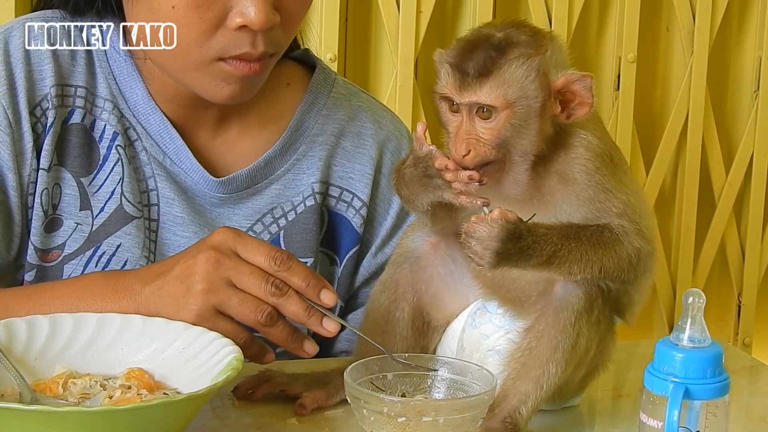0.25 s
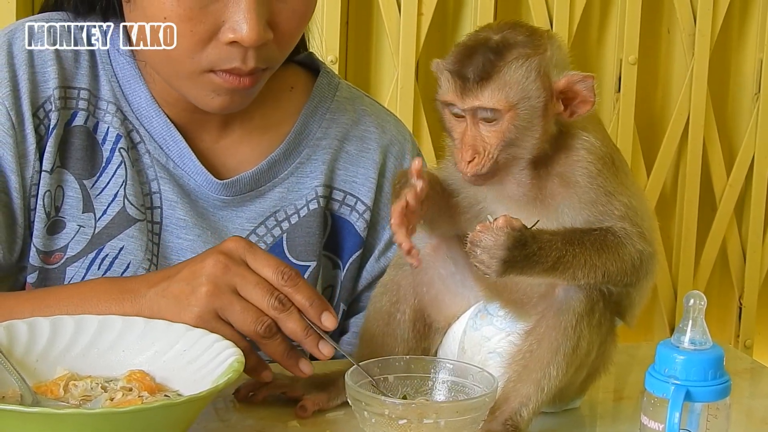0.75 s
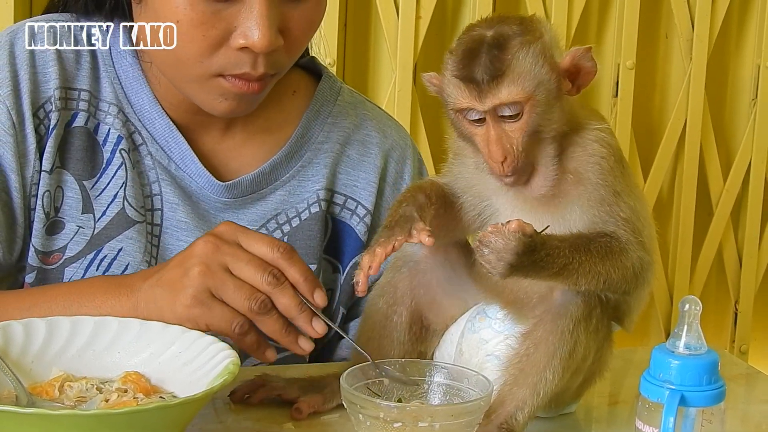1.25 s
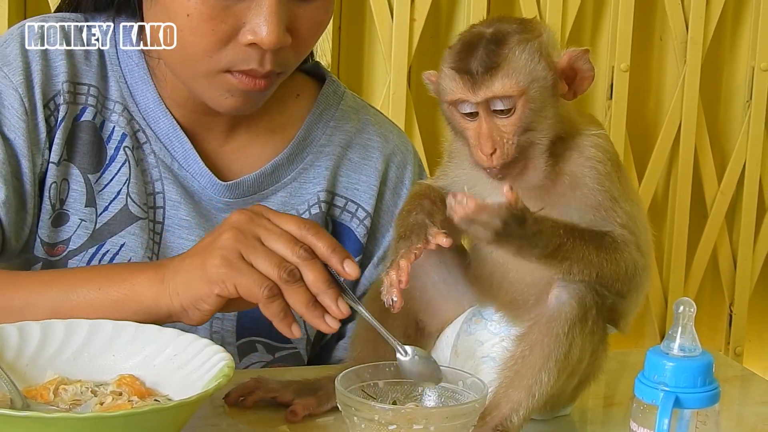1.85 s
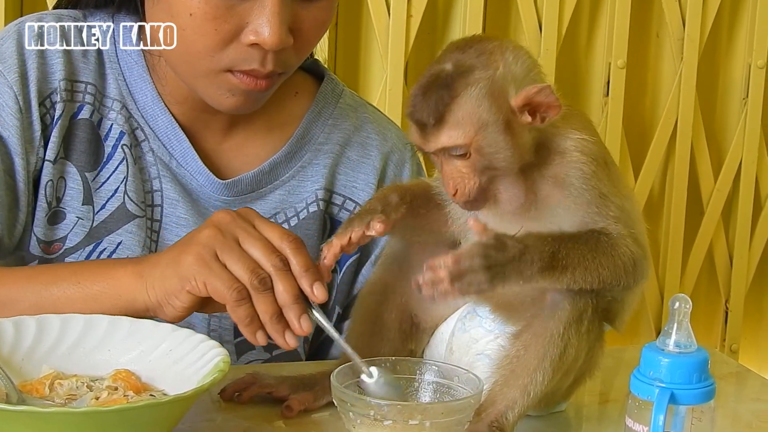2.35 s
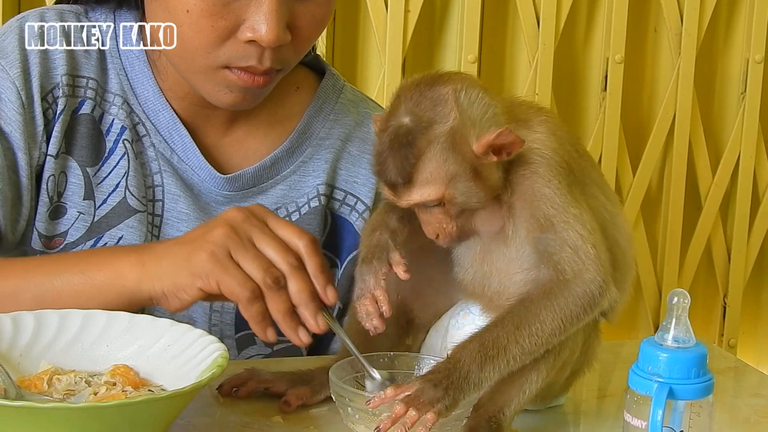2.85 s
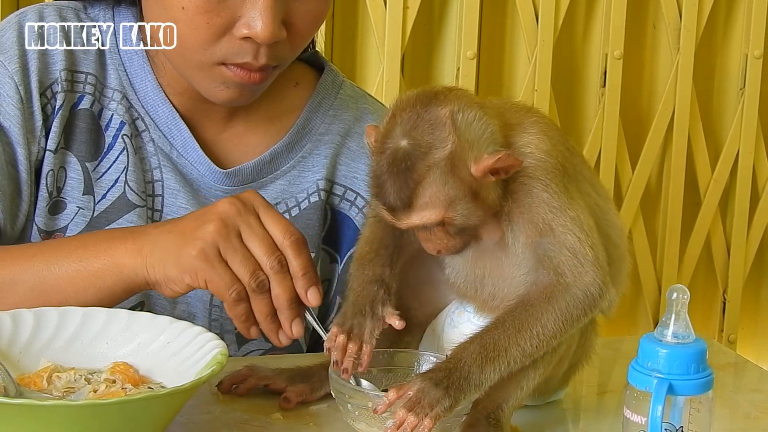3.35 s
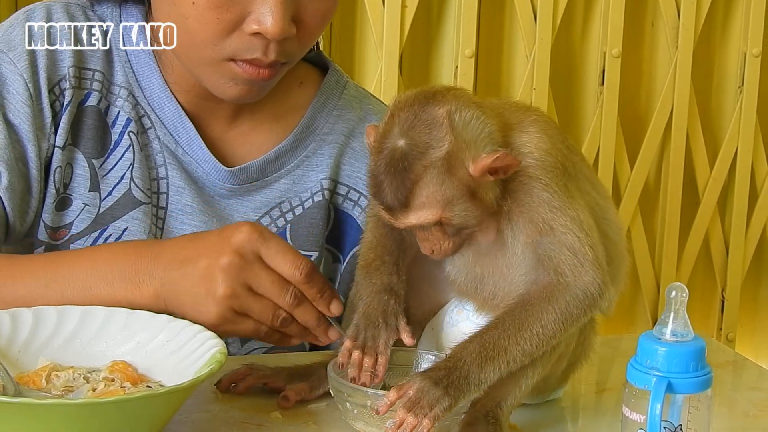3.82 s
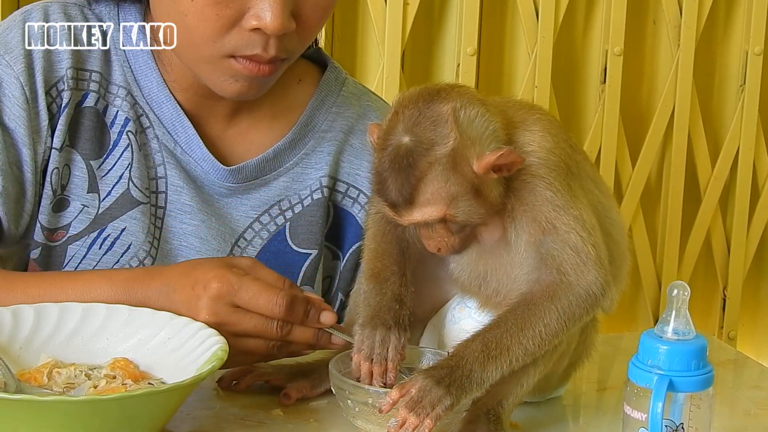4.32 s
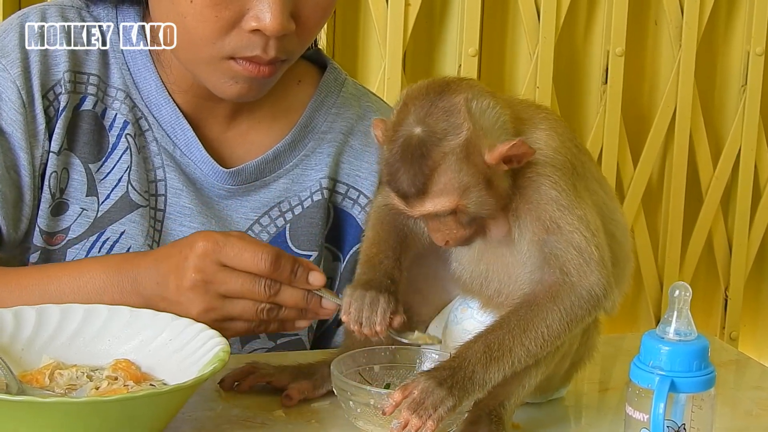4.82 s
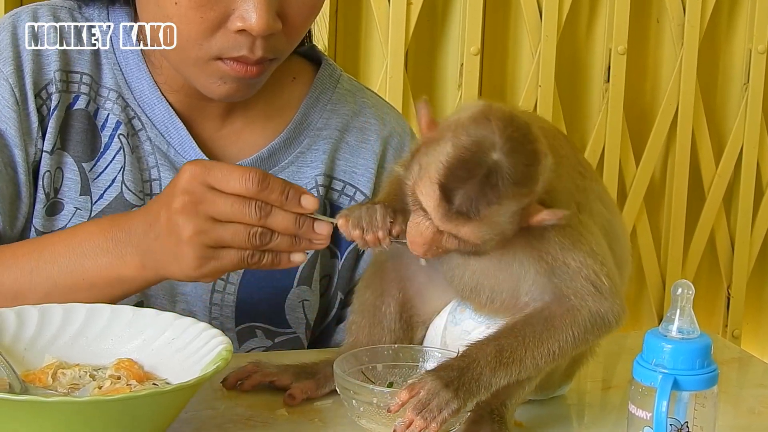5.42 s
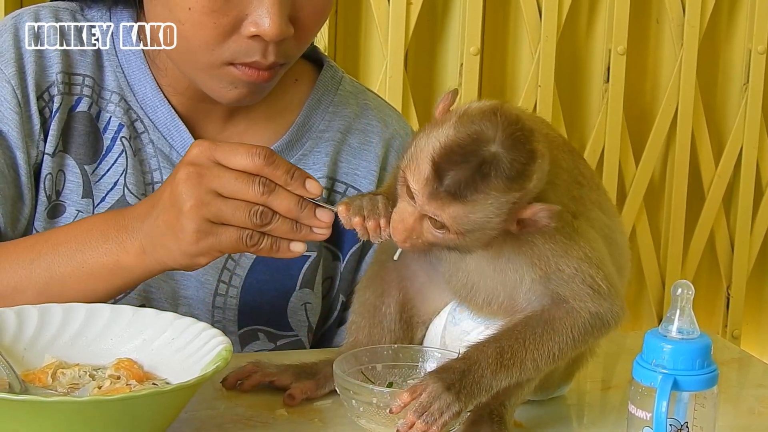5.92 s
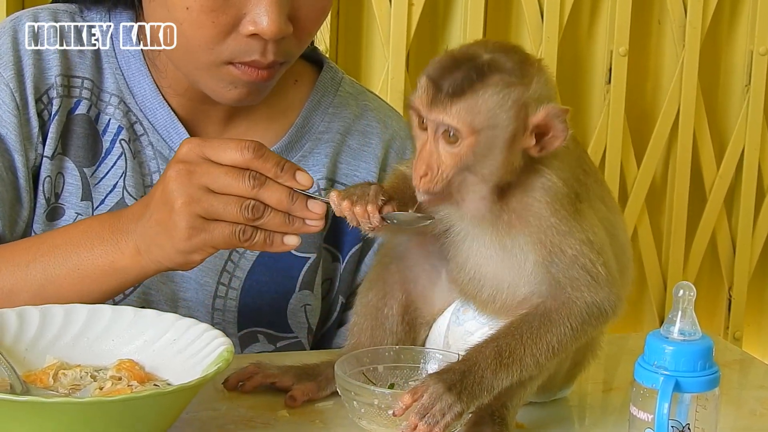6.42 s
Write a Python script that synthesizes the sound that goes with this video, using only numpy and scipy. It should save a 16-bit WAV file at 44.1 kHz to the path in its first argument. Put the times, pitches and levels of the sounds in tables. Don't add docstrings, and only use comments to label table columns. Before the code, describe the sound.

A spoon clinks brightly against a bowl while a sparrow chirps and distant birds answer; late on, one loud monkey coo drops in pitch.

```python
import sys
import numpy as np
from scipy import signal
from scipy.io import wavfile
from scipy.ndimage import uniform_filter1d

SR = 44100
rng = np.random.default_rng(int(sys.argv[2]) if len(sys.argv) > 2 else 0)


def attenuation_scalar(level_db):
    decades = np.asarray(level_db, float) / 20
    return 10 ** decades


def persist_wave(psi):
    counts = np.round(np.clip(psi, -1, 1) * 32767).astype(np.int16)
    wavfile.write(sys.argv[1], SR, np.atleast_2d(counts).T)


N = 294179

# t/s, f/Hz, level/dB (effort)
COO_PATH = [
    (5.59, 756, -24.5),
    (5.64, 792, -21),
    (5.699, 790.5, -19.5),
    (5.75, 776.3, -19.5),
    (5.807, 742.2, -17.5),
    (5.83, 711.7, -18),
    (5.885, 676.4, -19),
    (5.92, 650, -27),
    (5.985, 525.6, -32.5),
]
# f/Hz, level/dB
LOW_THROAT = [(1500, -9), (1800, 0), (2000, -2), (2150, -15), (2900, -16), (3450, -3), (3900, -15),
              (4600, -24), (6000, -60)]
# f/Hz, level/dB
HIGH_THROAT = [(4700, -34), (5050, -21), (5400, -10), (5800, 0), (6200, 1), (7000, -5), (7500, -1),
               (7950, -2), (8300, -13), (8700, -21), (10000, -70)]
# t/s, level/dB, low pitch factor, high pitch factor, length factor
CHIRPS = [
    (0.442, -32, 1.01, 1.016, 0.81),
    (1.451, -34.5, 1.04, 0.99, 0.87),
    (2.451, -32, 1.038, 0.99, 0.98),
    (3.996, -32.5, 1.008, 1.02, 0.87),
    (4.985, -34.5, 1.01, .96, 0.96),
    (6.195, -31.5, 1.005, 0.99, 0.82),
]
# t/s, level/dB, first f/Hz, last f/Hz, length/s
FAR_CALLS = [(0.0, -51, 5200, 4490, 0.031), (0.145, -46, 7090, 5870, 0.082), (0.3, -60, 3700, 3498, 0.091),
             (0.951, -43.5, 6700, 6250, 0.052), (1.415, -38.5, 6100, 6240, 0.062),
             (2.029, -45, 7180, 5900, 0.1), (2.846, -52.5, 4280, 3984, 0.13),
             (3.133, -42, 6050, 5760, 0.083), (3.651, -46, 6500, 6150, .07), (3.972, -52, 6800, 6000, .06),
             (4.498, -42.5, 6900, 6460, 0.057), (4.99, -43, 6900, 6780, 0.059)]
# t/s, level/dB, first f/Hz, last f/Hz, length/s
SCOLDS = [
    (3.169, -47.5, 5590, 5000, 0.15),
    (4.349, -54.5, 4740, 4400, .2),
    (6.08, -48, 7300, 6470, 0.13),
    (6.372, -38.5, 5280, 5750, 0.12),
    (6.42, -47.5, 4410, 4220, 0.094),
    (6.451, -41.5, 6340, 7060, 0.15),
    (6.561, -42, 6360, 6980, .11),
    (6.58, -41.5, 5040, 4610, 0.1),
]
# t/s, level/dB, first f/Hz, last f/Hz, length/s
PEEPS = [
    (3.212, -53.5, 5900, 5680, 0.18),
    (3.702, -46, 7000, 6800, 0.054),
    (6.559, -37.5, 4770, 4830, 0.013),
]
# t/s, peak level/dB, bowl knock level/dB, lower ring level/dB, left-right level/dB
TAPS = [
    (0.759, -21.5, -13, -10.5, 4.5),
    (0.781, -30, -18, -32, -8),
    (1.019, -50, -17, 5, -3.5),
    (1.6602, -28, -12.5, -3.5, 1),
    (2.0572, -37, -16, -31, 2),
    (3.4489, -19.5, -19.5, -9, 1),
]
# f/Hz, level/dB, t60/s
SPOON_MAIN = [(6728, -12, .5), (6757, -12, .45), (6804, -13, .35), (6700, 1, .045)]
# f/Hz, level/dB, t60/s
SPOON_UPPER = [(5900, -8, .03), (7700, -14, 0.024), (9330, -27, .02), (10200, -23, .04), (10700, -21, .02)]
# f/Hz, level/dB, t60/s
SPOON_HANDLE = [(3795, -15, .4), (3815, -19, .3), (3850, 0, .03), (4500, 0, .03)]
# f/Hz, level/dB, t60/s
BOWL_KNOCK = [(1068, -6.5, 0.12), (1355, 5.5, 0.024), (1550, 6, 0.025), (2660, -7, 0.028)]
# t/s, level/dB
RUSTLE = [
    (6.2, -76),
    (6.32, -46.5),
    (6.45, -49),
    (6.55, -46.5),
    (6.67, -48.5),
]
# t/s, length/s, level/dB (rms), f/Hz
PUMP_RUNS = [
    (.3, .95, -60, 333),
    (1.0, 1.36, -56, 206.7),
    (1.999, 1.28, -54, 332.3),
    (3.35, 0.72, -58, 336.4),
    (4.9, 1.15, -55.5, 333.5),
    (5.25, 0.52, -53.5, 219.6),
    (5.9, 0.57, -50.5, 160),
]
# f/Hz, width f/Hz, level/dB (rms)
HUM = [(76.3, 11, -63), (162, 15, -56), (211.5, 24, -59), (257.7, 19, -63.5)]
# t/s, level/dB
HUM_SWELL = [
    (0.0, -54),
    (0.03, -47.5),
    (0.13, -52.5),
    (2.6, -48.5),
    (4.12, -52),
    (5.35, -48.5),
    (6.39, -48),
    (6.46, -53.5),
    (6.67, -52.5),
]
# f/Hz, level/dB (per Hz)
WASH = [(18, -41.5), (30, -35), (64, -6.5), (108, -6), (141, -12.5), (225, -4), (278, -5.5), (642, -12.5),
        (1110, -7), (1980, -11), (3600, -19), (4300, -14.5), (5360, -14), (7150, -15.5), (9290, -35.5),
        (15700, -43.5)]
# f/Hz, likeness
WASH_LIKENESS = [(60, 0.91), (150, 0.91), (380, 0.92), (950, 0.9), (2380, 0.74), (5980, 0.4), (15000, 0.02)]
# f/Hz, t60/s
ROOM = [(200, 1), (700, 0.56), (2000, 1), (5000, 0.88), (7000, 0.76), (12000, 0.077)]

FULL_DB, OPEN_S, SHUT_DB, PRESS_DB_PER_S = -17.5, 0.036, -26.5, 33.5
OCTAVE_DB, OCTAVE_SHARE, LOW_DB, LOW_SHARE, HIGH_DB, HIGH_SHARE = -44, 0.19, -50, 0.24, -30, 0.75
REST_HZ, THROAT_FOLLOWS, OCTAVE_DB_PER_OCTAVE, FRONT_HZ = 770, 0.3, 23, 7400
CHIRP_S, SCOOP_S, HOLD_S, RELEASE_S = 0.2, 0.01293, 0.033, 0.017
START_HZ, TOP_HZ, FLOOR_HZ, CLIMB_HZ_PER_S = 4252, 4840, 4140, 2900
WARBLE_PER_S, SLOWING, DIP_DB, SAG_DB_PER_S = 48, 75, -3, -8
HELD_DB, FLICK_DB, FLICK_S, UNEVEN = -3, 4, 0.006, 0.15
ACCENT_S, ACCENT_WIDTH_S, ACCENT_DB, ACCENT_NARROWS = 0.108, 0.008, 5.5, 0.7
JOIN_S, UPPER_DB, UPPER_HZ, ARCH_HZ, SINK_HZ, ARCH_POWER = 0.05, -3, 5784, 502, -400, 0.8
FAR_TRILL, SCOLD_TRILL, PEEP_TRILL = 0.042, 0.112, 0.01
WASH_DB = -43


def monkey():
    s, *columns = np.transpose(COO_PATH)
    t = np.arange(s[0], s[-1], 1 / SR)
    hz, effort_db = (np.interp(t, s, column) for column in columns)
    drop_db = effort_db - FULL_DB
    shut_db = SHUT_DB * np.exp(-(t - s[0]) / OPEN_S)
    octave_db = OCTAVE_DB + OCTAVE_SHARE * drop_db + shut_db + OCTAVE_DB_PER_OCTAVE * np.log2(hz / REST_HZ)
    low_db = LOW_DB + LOW_SHARE * drop_db + PRESS_DB_PER_S * (t - s[0])
    high_db = HIGH_DB + HIGH_SHARE * drop_db + shut_db

    hz = uniform_filter1d(hz, 600) * (1 + 0.0012 * wobble(len(t), span=150))
    turn = 2 * np.pi * np.cumsum(hz) / SR
    voice = attenuation_scalar(effort_db) * np.sin(turn)
    voice += attenuation_scalar(octave_db + 4.9 * wobble(len(t), span=500)) * np.sin(2 * turn)
    for k in range(3, 17):
        follows = THROAT_FOLLOWS * np.clip((FRONT_HZ - k * hz) / 900, 0, 1)
        throat_hz = k * hz * (REST_HZ / hz) ** follows
        colour = attenuation_scalar(low_db + read(LOW_THROAT, k * hz)) + attenuation_scalar(high_db - 7.0 + read(HIGH_THROAT, throat_hz))
        fade = attenuation_scalar(2.5 * wobble(len(t), span=600))
        voice += colour * fade * np.sin(k * turn + k * k)
    breath = band(band(rng.standard_normal(len(t)), 4170, 8300), 4800, 8600)
    voice += attenuation_scalar(high_db - 17) * evened(breath)
    out = np.zeros((2, N))
    add(out, s[0], np.sqrt(2) * voice * signal.windows.tukey(len(t), 0.1), pan_db=0.1)
    return out


def sparrow():
    out = np.zeros((2, N))
    for s, db, low, high, longer in CHIRPS:
        t = np.arange(0, CHIRP_S * longer, 1 / SR) / longer
        low_hz, low_db = low_side(t)
        high_hz, high_db = high_side(t)
        add(out, s, side(low * low_hz, db + low_db, trill=0.0079, octave_db=-32.5), pan_db=1.2)
        add(out, s, side(high * high_hz, db + high_db, trill=0.1376, octave_db=-57), pan_db=1.2)
    return out


def low_side(t):
    since = np.maximum(t - HOLD_S, 0)
    warble = (WARBLE_PER_S - SLOWING * since) * since
    dip = 0.5 - 0.5 * signal.sawtooth(2 * np.pi * (warble + 0.5), 0.5)
    accent = np.exp(-((t - ACCENT_S) / ACCENT_WIDTH_S) ** 2)
    scoop = np.minimum(t / SCOOP_S, 1)
    reach_hz = (TOP_HZ - FLOOR_HZ + CLIMB_HZ_PER_S * since) * (1 - ACCENT_NARROWS * accent)
    uneven_dip = dip * (1 + UNEVEN * wobble(len(t), span=500))
    hz = FLOOR_HZ + reach_hz * (1 - uneven_dip) + (START_HZ - TOP_HZ) * (1 - scoop)
    ends_db = -10 * (1 - scoop) - 16 * np.clip(1 - (CHIRP_S - t) / RELEASE_S, 0, 1)
    hold_db = HELD_DB * (t < HOLD_S) + FLICK_DB * np.exp(-((t - HOLD_S) / FLICK_S) ** 2)
    return hz, -1.5 + ends_db + hold_db + DIP_DB * dip + SAG_DB_PER_S * since + ACCENT_DB * accent


def high_side(t):
    u = np.clip((t - JOIN_S) / (CHIRP_S - JOIN_S), 0, 1)
    arch = np.sin(np.pi * u ** ARCH_POWER)
    return UPPER_HZ + ARCH_HZ * arch + SINK_HZ * u, UPPER_DB + 24 * np.log10(abs(arch) + 1e-4)


def side(hz, db, trill, octave_db):
    t = np.arange(len(hz)) / SR
    cycles = 75 * t + 0.4 * wobble(len(t), span=400) + rng.random()
    swing = signal.sawtooth(2 * np.pi * cycles, 0.5)
    return whistle(uniform_filter1d(hz * (1 + trill * swing), 100), db, rough=0.0138, octave_db=octave_db)


def whistle(hz, db, rough, octave_db):
    hz = hz * (1 + rough * wobble(len(hz), span=60))
    turn = 2 * np.pi * np.cumsum(hz) / SR
    rasp = 1 + 0.24 * wobble(len(hz), span=30)
    flutter_db = 1.5 * wobble(len(hz), span=120)
    tone = np.sin(turn) + attenuation_scalar(octave_db) * np.sin(2 * turn)
    return np.sqrt(2) * attenuation_scalar(db + flutter_db) * rasp * tone


def spoon():
    out, t = np.zeros((2, N)), np.arange(SR // 2) / SR
    soft = 1 - np.exp(-t / 0.0004)
    for s, db, knock_db, low_db, pan_db in TAPS:
        burst = attenuation_scalar(-1.5 - 60 * t / 0.011) * rng.standard_normal(len(t))
        tick = band(band(burst, 3300, 8600), 3200, 9500)
        steel = ring(SPOON_MAIN, t) + ring(SPOON_UPPER, t) + attenuation_scalar(low_db + 2.5) * ring(SPOON_HANDLE, t)
        knock = attenuation_scalar(knock_db + 7.5) * ring(BOWL_KNOCK, t)
        add(out, s, attenuation_scalar(db - 7) * (tick + soft * steel + soft * knock), pan_db)
    return out


def ring(modes, t):
    out = np.zeros(len(t))
    for hz, db, t60 in modes:
        decay = attenuation_scalar(db + rng.normal(0, 0.56) - 60 * t / t60)
        out += decay * np.sin(2 * np.pi * hz * rng.normal(1, 0.0015) * t)
    return out


def rustle():
    s, db = np.transpose(RUSTLE)
    grains = rng.standard_normal((2, N)) * attenuation_scalar(2.9 * wobble(N, span=90))
    level_db = np.interp(np.arange(N) / SR, s, db, left=-120)
    return attenuation_scalar(level_db) * evened(band(band(grains, 2300, 8200), 2000, 7900))


def far_birds():
    out = np.zeros((2, 2, N))
    for near, calls, depth in ((0, FAR_CALLS, FAR_TRILL), (0, SCOLDS, SCOLD_TRILL), (1, PEEPS, PEEP_TRILL)):
        for s, db, first_hz, last_hz, length in calls:
            u = np.linspace(0, 1, round(length * SR))
            trill = 1 + depth * np.sin(2 * np.pi * 45 * length * u)
            hz = (first_hz + (last_hz - first_hz) * u) * trill
            call = whistle(hz, db, rough=0.014 - 0.0064 * near, octave_db=-56)
            add(out[near], s, call * signal.windows.tukey(len(u), 0.4), pan_db=0.6)
    return out


def pump():
    out = np.zeros((2, N))
    for s, length, db, hz in PUMP_RUNS:
        size = round(length * SR)
        turn = 2 * np.pi * np.cumsum(hz * (1 + 0.0044 * wobble(size, span=3000))) / SR
        level = attenuation_scalar(db + 1.5 + 2.2 * wobble(size, span=2500))
        add(out, s, level * np.sin(turn) * signal.windows.tukey(size, 0.2), pan_db=0.1)
    return out


def hum():
    t, out = np.arange(N) / SR, np.zeros(N)
    for hz, width_hz, db in HUM:
        r = np.exp(-np.pi * width_hz / SR)
        slow = rng.standard_normal(N) + 1j * rng.standard_normal(N)
        for _ in range(2):
            slow = signal.lfilter([1 - r], [1, -r], slow)
        out += attenuation_scalar(db) * evened((slow * np.exp(2j * np.pi * hz * t)).real)
    s, db = np.transpose(HUM_SWELL)
    return out * attenuation_scalar(1.53 * np.interp(t, s, db - db.mean()) + 1.2 * wobble(N, span=5000))


def wash():
    frames, hz = N // 256 + 5, np.fft.rfftfreq(1024, 1 / SR)
    a, b, c, d, patches = rng.standard_normal((frames, 513, 5)).T
    patches = evened(uniform_filter1d(uniform_filter1d(patches, size=14, axis=0), size=16, axis=1))
    same = np.clip(read(WASH_LIKENESS, hz), -1, 1)[:, None]
    left = a + 1j * b
    right = same * left + np.sqrt(1 - same ** 2) * (c + 1j * d)
    z = np.array([left, right]) * attenuation_scalar(read(WASH, hz)[:, None] + 1.41 * patches)
    sound = signal.istft(z, nperseg=1024, noverlap=768)[1][:, :N]
    return attenuation_scalar(WASH_DB - 1.1) * evened(sound)


def room(x, likeness, slower):
    taps = np.zeros((2, SR))
    at = np.arange(300, SR - 20, 20) + rng.integers(0, 20, (2, (SR - 301) // 20))
    np.put_along_axis(taps, at, rng.choice([-1., 1.], at.shape), 1)
    like = np.clip(likeness, 0, 1)
    taps[1] = like * taps[0] + np.sqrt(1 - like ** 2) * taps[1]
    hz, t, z = signal.stft(taps, SR, nperseg=256)
    decay = attenuation_scalar(-60 * t / (slower * read(ROOM, hz)[:, None]))
    tail = signal.istft(z * decay, SR, nperseg=256)[1]
    return signal.fftconvolve(x, tail / np.linalg.norm(tail[0]), axes=1)[:, :N]


def evened(x):
    return x / np.sqrt(np.mean(x ** 2) + 1e-20)


def wobble(size, span):
    return evened(uniform_filter1d(uniform_filter1d(rng.standard_normal(size), span), span))


def read(points, hz):
    f, value = np.transpose(points)
    return np.interp(np.log(hz + 1), np.log(f + 1), value)


def band(x, low_hz, high_hz):
    return signal.sosfilt(signal.butter(2, [low_hz, high_hz], "bandpass", fs=SR, output="sos"), x)


def add(mix, s, sound, pan_db):
    part = mix[:, max(round(s * SR), 0):][:, :len(sound)]
    part += sound[:part.shape[1]] * attenuation_scalar(np.array([[pan_db / 2], [-pan_db / 2]]))


def scene():
    coo, taps, chirps, (far, peeps) = monkey(), spoon(), sparrow(), far_birds()
    near = coo + attenuation_scalar(-10.0) * room(coo, likeness=0.97, slower=1.32)
    near += taps + attenuation_scalar(-4.5) * room(taps, likeness=0.71, slower=0.88)
    near += attenuation_scalar(-6.5) * room(band(coo, 5000, 9500), likeness=0.1, slower=0.72)
    birds = attenuation_scalar(-3) * chirps + attenuation_scalar(-1.5) * room(chirps, likeness=0.3, slower=0.9)
    birds += attenuation_scalar(-9) * far + attenuation_scalar(-0.8) * room(far + 0.6 * peeps, likeness=0.3, slower=0.98)
    birds += attenuation_scalar(2) * peeps
    return near + birds + wash() + hum() + pump() + rustle()


def top_cut(x):
    return signal.sosfilt(signal.butter(12, 15740, fs=SR, output="sos"), x)


def record(dry):
    thin = signal.sosfilt(signal.butter(3, 40, "highpass", fs=SR, output="sos"), dry)
    return top_cut(thin)


dry = scene()
out = record(dry)
persist_wave(out)
```